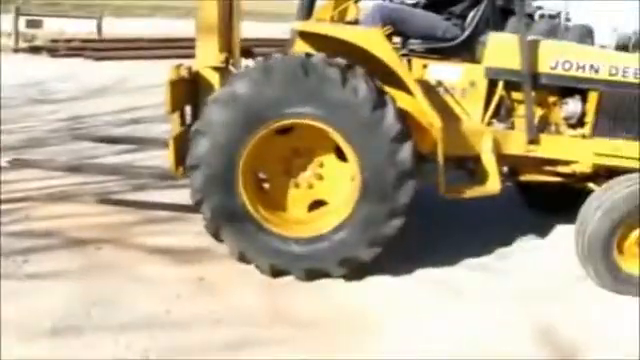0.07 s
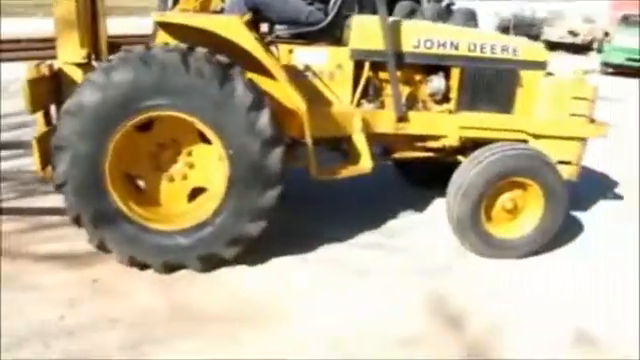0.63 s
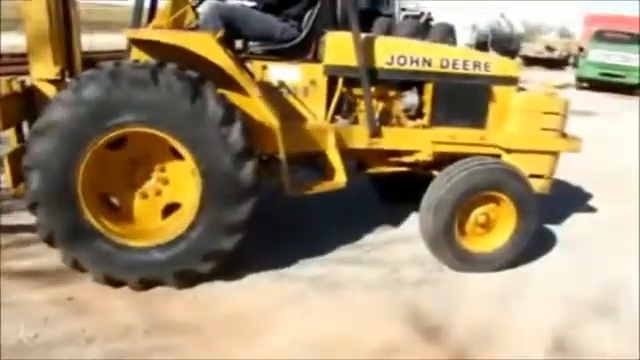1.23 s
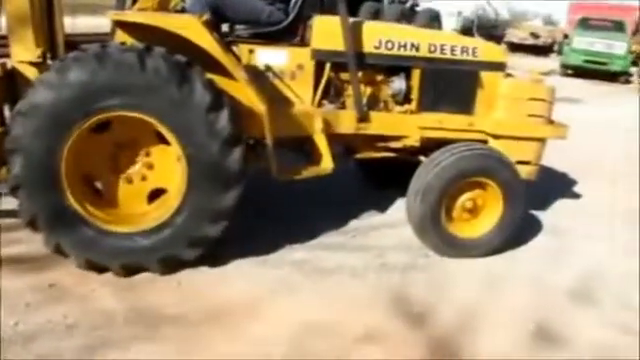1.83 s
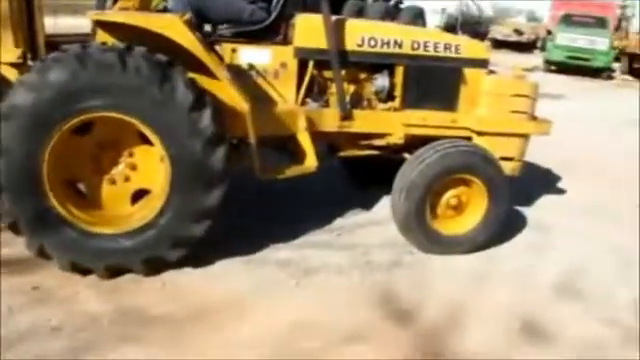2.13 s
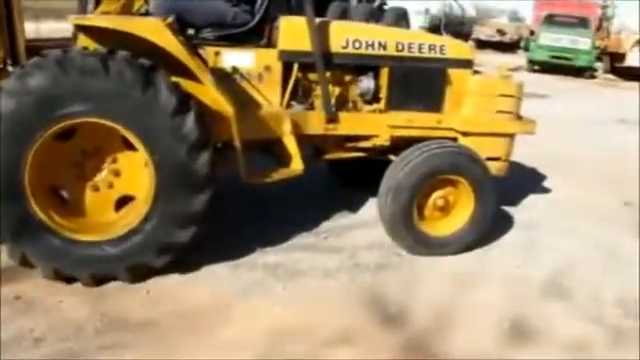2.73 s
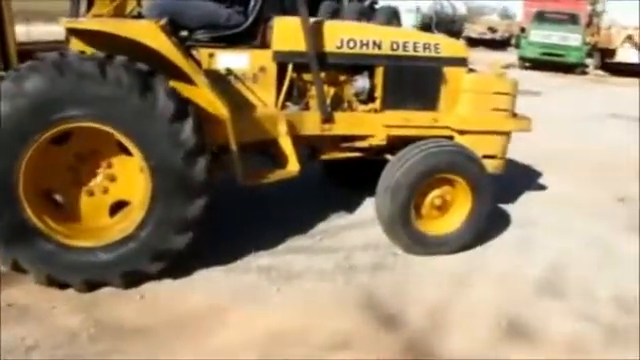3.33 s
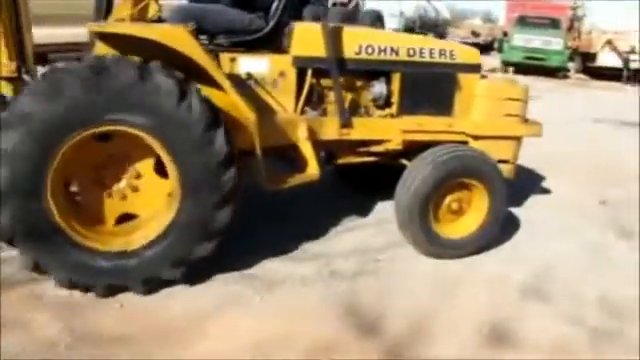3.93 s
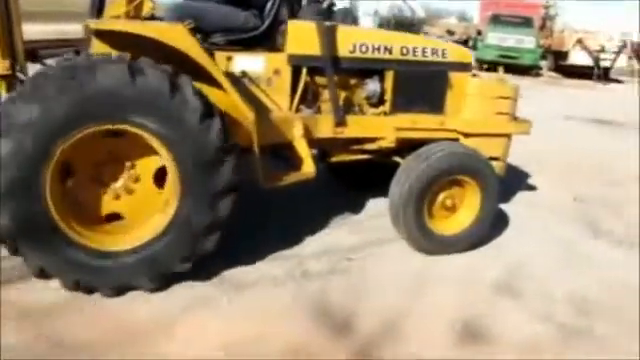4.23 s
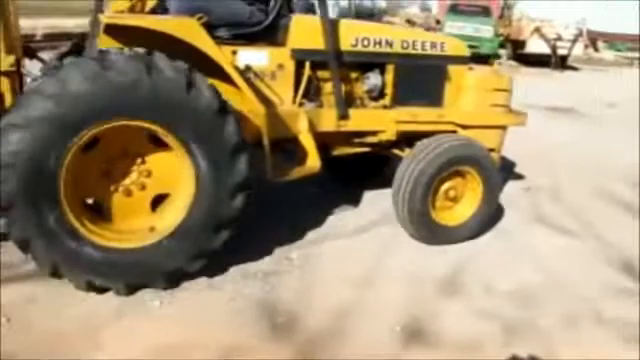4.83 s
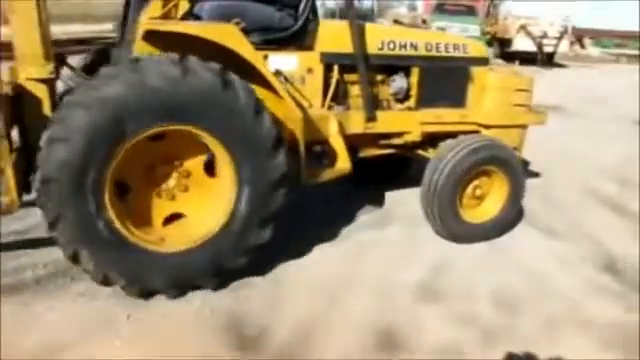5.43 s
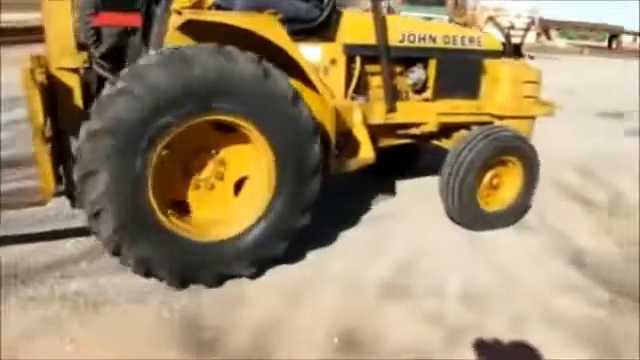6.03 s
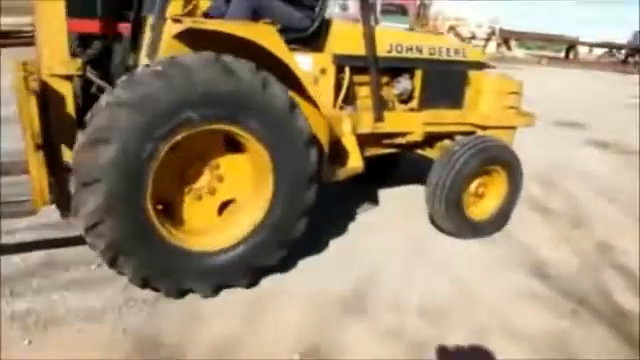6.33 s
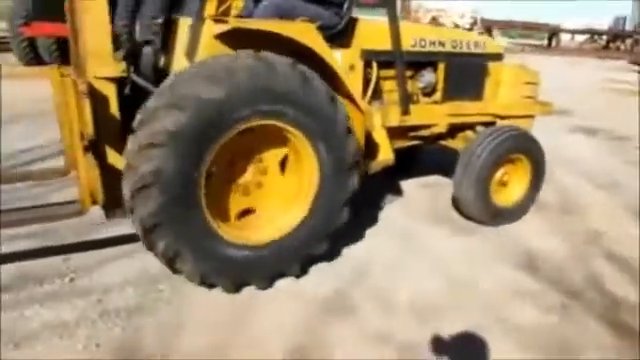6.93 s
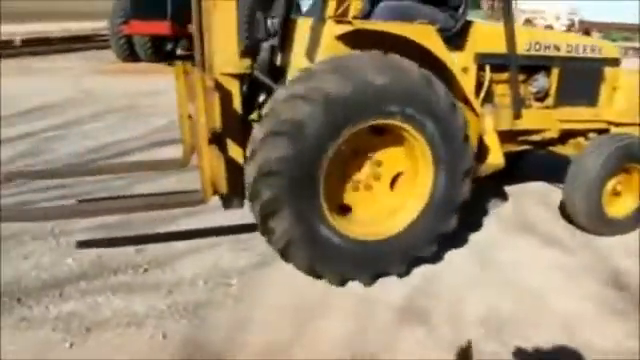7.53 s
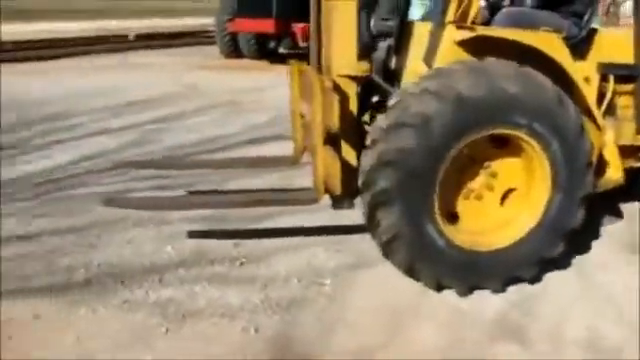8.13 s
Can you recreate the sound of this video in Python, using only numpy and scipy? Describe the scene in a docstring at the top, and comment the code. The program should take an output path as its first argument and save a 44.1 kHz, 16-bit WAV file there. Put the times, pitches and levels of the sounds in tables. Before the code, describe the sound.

A diesel forklift knocks and clatters as it rolls slowly past at close range, with light wind buffeting the microphone.

```python
"""Wind buffets a stereo microphone in a gravel yard; off to the right a three-cylinder diesel forklift knocks.
It rolls slowly past at close range, sagging a little under load as it comes abreast, while the breeze drops.
Every firing knocks the block, rings the panels and thumps the exhaust; injectors and valve gear clatter
between firings and the drive train drones. Tyres crunch faintly on grit, and gusts keep hitting the ports."""
import sys
import numpy as np
from scipy import signal
from scipy.fft import rfft, irfft, next_fast_len
from scipy.io import wavfile
from scipy.ndimage import map_coordinates

SR = 44100
rng = np.random.default_rng(int(sys.argv[2]) if len(sys.argv) > 2 else 0)


def to_wav(s):
    """Save 16-bit WAV."""
    ch = np.atleast_2d(s).T  # columns
    pcm = np.round(np.clip(ch, -1, 1) * 32767)  # PCM
    wavfile.write(sys.argv[1], SR, pcm.astype(np.int16))


N = 360738
TIME = np.arange(N) / SR

# engine speed: t/s, firing rate/Hz
FIRING_RATE = [(0.0, 28.414), (0.9, 28.517), (2.0, 28.319), (3.1, 28.103), (3.5, 26.89), (3.85, 25.395),
               (4.3, 26.159), (4.7, 26.29), (5.05, 27.019), (5.4, 26.75), (5.8, 27.038), (6.5, 27.027),
               (6.95, 27.232), (7.15, 28.122), (7.55, 27.998), (7.8, 28.571), (8.18, 27.489)]
# the three cylinders in firing order: level/dB
CYLINDER_DB = [-.6, 0, .7]
# the forklift's loudness, rising as it nears and ducking briefly after the strongest gusts: t/s, level/dB
FORKLIFT_LEVEL = [(0, -37.5), (1.6, -31.5), (2.6, -31), (3.5, -26), (4.05, -24), (4.9, -24.5), (5.3, -23.5),
                  (5.66, -29), (5.9, -25.5), (6.35, -25), (6.7, -24), (7.0, -26.5), (7.1, -28.5),
                  (8.18, -26.5)]
# its bearing, off to the right at first and last: t/s, lag of the left port/s
LEFT_LAG = [(0, 5e-5), (.8, 1.7e-5), (2, 2e-6), (5, -2e-6), (6, 9e-6), (7, 1e-6), (7.5, 3.5e-5),
            (8.18, 4.7e-5)]
# its colour when far off axis: f/Hz, gain/dB
OFF_AXIS = [(180, 2), (290, -7), (350, -2), (440, 2), (600, 2), (800, 1.5), (2000, -1), (4000, 1),
            (6500, 2.5), (8000, -3.5), (10500, -29)]
# its image at the two microphone ports: f/Hz, likeness/0-1, left minus right/dB
PORT_IMAGE = [(100, 1, -1.5), (600, 0.98, -2), (1100, 0.93, -0.5), (2030, 0.92, -5), (3220, 0.82, -4),
              (5100, 0.73, -0.5), (8600, 1, -0.5)]
# broad spectra of knock, injector tick and drive train: f/Hz, level/dB
KNOCK_SPECTRUM = [(60, -3), (140, 6), (250, -0.5), (400, -1), (680, -6), (900, 1), (1300, -2), (2200, -0.5),
                  (2700, -4), (3500, -6), (5000, -10), (7000, -17.5), (10000, -75)]
TICK_SPECTRUM = [(1500, -19), (3500, 1), (5000, 1.5), (6500, -2), (9000, -2.5), (10500, -37), (12000, -56)]
DRONE_SPECTRUM = [(60, -16), (130, -14), (250, -0.5), (340, -3.5), (520, -1.5), (700, -2.5), (1100, -1.5),
                  (2000, -1.5), (4000, -3.5), (9000, -41)]
# resonances of block and covers, then of gear housing and hood: f/Hz, width/Hz, boost/dB
BLOCK_MODES = [(1025, 69, 4.5), (1361, 36, 9.5), (1514, 57, 6.5), (1917, 42, 7.5), (2023, 37, 8),
               (3320, 50, 4.5)]
HOUSING_MODES = [(224, 28, 5), (253, 16, 9.5), (424, 17, 11), (492, 26, 8.5), (567.5, 17, 8)]
# panels and guards that beam their ring past the microphone in turn:
# f/Hz, width/Hz, level against the knock/dB, facing at t/s, spread/s, buzz between firings/dB
PANEL_MODES = [(426, 18, -10.5, 3.15, .45, 6), (455, 90, -3.5, 6.76, .22, 6), (560, 8, -14, 5.4, .4, 6),
               (827, 24, -8.5, 6.55, .7, 6), (840, 50, -12, 3.4, .4, 3), (1704, 20, -12, 4.9, .7, 0),
               (2835, 80, -13.5, 2, 1.2, -6), (3175, 60, -14, 2.4, 1.4, -6), (3490, 130, -8.5, .5, .4, -12),
               (3620, 50, -15, 7.2, .5, -3), (3840, 110, -11.5, 7.9, 1.0, -14)]
# thin steel ringing on the engine: t/s, f/Hz, level against the knock/dB
STEEL_RING = [(1, 3470, -17), (3.5, 3420, -18), (4.3, 3430, -14), (5.2, 3440, -12), (5.6, 3380, -16),
              (5.95, 3385, -11.5), (6.25, 3440, -17), (6.55, 3470, -11.5), (7, 3450, -18),
              (8.18, 3440, -14)]
# exhaust note: multiple of the firing rate, level side on/dB, level mast on/dB
EXHAUST_HARMONICS = [(1, -3.5, 0.5), (2, -2.5, -1), (3, -10, -8.5), (4, -9.5, -9.5), (5, -6.5, -14),
                     (6, -13.5, -15), (7, -8, -5.5), (8, -9.5, -10), (10, -13, -20), (12, -16, -23)]
# single firings that knock harder, and an occasional clank or thump: t/s, relative level/dB, f/Hz, t60/s
HARD_KNOCKS = [(0.693, 5, 780, 0.027), (.822, -3, 2700, 0.038), (2.442, 0, 2010, .04),
               (3.429, 2, 1100, 0.057), (3.555, -3, 2980, 0.045), (4.442, -1, 1700, .04),
               (4.63, 6.5, 2550, 0.031), (5.081, -0.5, 2000, .04), (5.118, -0.5, 1510, 0.064),
               (5.266, 2.5, 1700, 0.068), (6.271, 2, 1300, 0.038), (6.419, 2, 1500, .04),
               (6.716, 1.5, 1900, .05), (6.968, -5, 4200, 0.18), (6.973, -0.5, 940, .14),
               (6.985, -3, 173, .16)]
# stones squeezed under a tyre: t/s, level/dB
STONE_CRUNCHES = [(6.827, -30), (6.971, -28)]
# crackle of grit: f/Hz, level/dB
GRIT_SPECTRUM = [(400, -32), (1500, -9.5), (4000, 0.5), (7000, -3.5), (9500, -7.5), (12000, -26.5)]
# the breeze, fresh at first, then light air: t/s, relative level/dB
BREEZE_LEVEL = [(0, -25), (.48, -20.5), (.72, -31), (1.15, -28.5), (1.34, -24.5), (2.15, -23.5),
                (2.4, -31.5), (2.8, -42), (4.3, -40.5), (5.15, -46), (6.0, -38), (7.3, -47), (8.18, -45)]
# gusts on the ports: t/s, length/s, relative flutter/dB, relative low push/dB, left minus right/dB
GUST_EVENTS = [(0.027, 0.054, -22.5, -35, 12), (0.935, 0.081, -22, -28, 18), (1.328, 0.055, -22.5, -33, 9),
               (1.531, 0.11, -23.5, -28, 5), (1.944, 0.3, -26, -26.5, 12), (2.467, 0.11, -23.5, -30, 6),
               (3.005, 0.13, -31, -35, 7), (4.24, 0.19, -29, -27.5, 8), (4.493, 0.044, -21, -22.5, 19),
               (4.713, 0.12, -30, -31.5, 16), (5.304, 0.036, -18.5, -18, 7), (5.504, 0.1, -19.5, -31, 14),
               (5.769, 0.08, -25, -22.5, 4), (5.86, .27, -33.5, -25, -8), (6.29, 0.17, -42, -29.5, 15),
               (6.757, 0.04, -20.5, -24, -15), (6.898, 0.19, -29.5, -22.5, -23), (7.36, 0.049, -32, -22, 7),
               (7.434, 0.13, -27, -22.5, 17), (7.793, 0.054, -24, -21.5, 13), (7.916, 0.28, -45, -27, 3),
               (8.106, 0.063, -20, -20, 15)]
# wind noise of breeze, gusts and slow eddies: f/Hz, level/dB
BREEZE_SPECTRUM = [(30, -24), (90, 1.5), (160, 0.5), (240, -2.5), (350, -8), (500, -15), (800, -33),
                   (2000, -33), (6000, -93)]
GUST_SPECTRUM = [(30, -17), (90, -1), (150, -1), (240, -2.5), (350, -10.5), (500, -15.5), (800, -28),
                 (2000, -29), (6000, -95)]
EDDY_SPECTRUM = [(8, 4.5), (25, -4), (60, 5.5), (100, 2), (160, -9), (300, -34), (1000, -99)]

# balance of each part with the forklift at USUAL_DB: side on/dB, mast on/dB, dB per dB of forklift level
KNOCK_MIX, TICK_MIX = (1.32, 0.37, 1), (-11.5, -13, 1)
DRIVE_MIX, EXHAUST_MIX = (-7.5, -3.5, 0.79), (-.3, -1.7, 0.92)
USUAL_DB = -24
TURN_MIDDLE_S, TURN_S = 5.72, 2.7
CRACK_DB, SLAP_DB, TAP_DB = -4.7, -13.5, -9  # against the body of the knock
FREE_RATE_HZ, HARDEN_DB_PER_HZ = 28.5, .4  # the crack hardens as load drags the engine down
PANEL_WAVER, PANEL_AWAY_DB = .004, -15
EDDY_DB, EDDY_SWING_DB, BREEZE_SWING_DB = -32.5, 3.5, 2
GEAR_ORDER = 21  # whine cycles per firing
TOP_HZ = 11600


def diesel_knock(cycle, level_db):
    """Each firing cracks and rings the block and its panels; piston slap and a valve tap follow."""
    crack = blows(cycle, place=.07, rise=.0005, t60=.04, scatter_db=1.5, jitter=.0004)
    knock = blows(cycle, place=.01, rise=.0035, t60=.125, scatter_db=.7, jitter=.0005)
    slap = blows(cycle, place=.4, rise=.0005, t60=.04, scatter_db=2, jitter=.002)
    tap = blows(cycle, place=.76, rise=.001, t60=.11, scatter_db=1.2, jitter=.003)
    crack_db = CRACK_DB + HARDEN_DB_PER_HZ * (FREE_RATE_HZ - curves(FIRING_RATE)[0])
    power = knock + amp(crack_db) ** 2 * crack + amp(SLAP_DB) ** 2 * slap + amp(TAP_DB) ** 2 * tap
    grain = amp(1.2 * wobble(700))  # each knock is a spray of small metal contacts
    force = np.sqrt(power) * grain * port_noise()
    block = body(force, KNOCK_SPECTRUM, BLOCK_MODES)
    return amp(level_db) * (block + panels(crack) + thin_ring(crack))


def panels(crack):
    """Each panel rings at every crack, buzzes in between, and stands out while it faces the microphone."""
    out = np.zeros((2, N))
    hiss = port_noise()
    waver = 1 + PANEL_WAVER * wobble(5)
    for hz, width_hz, db, facing_s, spread_s, buzz_db in PANEL_MODES:
        shake = np.sqrt(crack + amp(buzz_db) ** 2) * hiss
        facing = np.exp(-((TIME - facing_s) / spread_s) ** 2)
        out += amp(db) * np.maximum(facing, amp(PANEL_AWAY_DB)) * resonance(shake, hz * waver, width_hz)
    return out


def thin_ring(crack):
    """Thin steel rings on from one firing to the next, drifting in pitch."""
    hz, db = curves(STEEL_RING)
    return amp(db) * resonance(np.sqrt(crack + 2) * port_noise(), hz, width_hz=70)


def exhaust(cycle, level_db):
    """The muffler passes only the low multiples of the firing rate, each slightly unsteady."""
    note = np.zeros(N)
    for multiple, side_db, mast_db in EXHAUST_HARMONICS:
        gain = amp(turning(side_db, mast_db) + 3.5 * wobble(11))
        phase = 2 * np.pi * multiple * cycle + rng.uniform(0, 2 * np.pi)
        note += gain * np.sin(phase + .5 * wobble(11))
    return amp(level_db - 1.5) * unit(note)


def drive_train(cycle, level_db, size=600):
    """Cams and gears push the housing alike every three firings; the fan rushes and one gear whines."""
    teeth = irfft(np.exp(2j * np.pi * rng.random(size // 2 + 1)))
    position = (cycle + .006 * wobble(8)) * size / 3
    force = unit(map_coordinates(teeth, [position], mode="grid-wrap"))
    fan = port_noise()
    push = fan + amp(-3 + 1.5 * wobble(4)) * force
    whine_db = level_db + turning(-18, -9.5) + 3 * wobble(9)
    whine = amp(whine_db) * np.sin(2 * np.pi * cycle * GEAR_ORDER + 1.2 * wobble(22))
    return amp(level_db + 4.5) * body(push, DRONE_SPECTRUM, HOUSING_MODES) + whine


def injectors(cycle, level_db):
    """Pump and nozzles tick brightly just ahead of each knock, over a light hiss."""
    ticks = blows(cycle, place=-.005, rise=.0014, t60=.058, scatter_db=1.4, jitter=.0005)
    force = np.sqrt(ticks + amp(-13)) * amp(0.52 * wobble(900)) * port_noise()
    return amp(level_db - 3) * body(force, TICK_SPECTRUM)


def hard_knocks(level_db):
    """Single firings knock harder, with an occasional clank or thump; each rings round its own pitch."""
    out = np.zeros((2, N))
    hiss = port_noise()
    for s, db, hz, t60 in HARD_KNOCKS:
        span = slice(int(s * SR), int(s * SR) + SR // 8)
        band = signal.butter(2, [hz / 1.3, hz * 1.3], "band", fs=SR, output="sos")
        ring = unit(signal.sosfilt(band, hiss[:, span])) + 0.12 * unit(hiss[:, span])
        out[:, span] += amp(db + 10.5) * ring * strike(TIME[span] - s, rise=0.0017, t60=t60)
    return amp(level_db) * filtered(out, lambda f: 1 / (1 + (f / 6000) ** 4))


def tyres(level_db):
    """Grit crackles under the lugs; two stones crunch louder."""
    crunch = sum(amp(db) * strike(TIME - s, rise=0.0018, t60=0.12) for s, db in STONE_CRUNCHES)
    grit = body(amp(0.99 * wobble(1200)) * port_noise(), GRIT_SPECTRUM)
    rolling = amp(level_db - 18.5 + 2.95 * wobble(12))
    return grit * (crunch + rolling)


def wind():
    """Turbulence right on the ports: a breeze from the left, slow eddies, and gusts that rise and fall."""
    breeze_db = curves(BREEZE_LEVEL)[0] + BREEZE_SWING_DB * wobble(12)
    breeze = leaning(lean_db=9.5) * amp(breeze_db) * turbulence(BREEZE_SPECTRUM)
    flutter_power = np.zeros((2, N))
    push_power = (leaning(lean_db=2) * amp(EDDY_DB + EDDY_SWING_DB * wobble(7.4))) ** 2
    rise_s, fall_s = 0.012, 0.054
    for s, length, flutter_db, push_db, lean_db in GUST_EVENTS:
        envelope = np.clip(np.minimum((TIME - s) / rise_s, .5 + (s + length - TIME) / fall_s), 0, 1)
        power = (leaning(lean_db) * envelope) ** 2
        flutter_power += amp(flutter_db) ** 2 * power
        push_power += amp(push_db) ** 2 * power
    flutter = np.sqrt(flutter_power) * turbulence(GUST_SPECTRUM)
    push = np.sqrt(push_power) * turbulence(EDDY_SPECTRUM)
    return amp(3.5) * (breeze + flutter) + amp(3) * push


def turbulence(spectrum):
    """Fairly even buffeting of rms 1, unrelated at the two ports."""
    return unit(np.tanh(body(rng.standard_normal((2, N)), spectrum) / 2))


def leaning(lean_db):
    """Gains of the two ports, mean power 1, for wind from one side."""
    return unit(amp(np.array([[lean_db], [-lean_db]]) / 2))


def placed(machine):
    """From off to the right the sound reaches the left port later and changes colour."""
    lag, = curves(LEFT_LAG)
    aside = np.clip(lag / lag.max(), 0, 1)
    coloured = filtered(machine, lambda f: amp(along(OFF_AXIS, f)))
    left, right = (1 - aside) * machine + aside * coloured
    return np.array([map_coordinates(left, [(TIME - lag) * SR], mode="nearest"), right])


def part_level(mix):
    """Level in dB of one part, following the forklift's loudness and its turn."""
    side_db, mast_db, growth = mix
    forklift_db, = curves(FORKLIFT_LEVEL)
    return USUAL_DB + growth * (forklift_db - USUAL_DB) + turning(side_db, mast_db)


def turning(side_db, mast_db):
    """A level in dB that shifts as the mast end comes round to the microphone."""
    return side_db + (mast_db - side_db) * np.clip(.5 + (TIME - TURN_MIDDLE_S) / TURN_S, 0, 1)


def port_noise():
    """White noise from the forklift, nearly alike at the two ports."""
    image = np.array(PORT_IMAGE)
    angle = lambda f: np.arccos(np.clip(along(image[:, :2], f), 0, 1)) / 2
    spread = lambda f: np.array([np.cos(angle(f)), np.sin(angle(f))])
    balance = lambda f: amp(np.outer([1, -1], along(image[:, ::2], f)) / 2)
    mid, side = filtered(rng.standard_normal((2, N)), spread)
    return filtered(np.array([mid + side, mid - side]), balance)


def blows(cycle, place, rise, t60, scatter_db, jitter):
    """Power envelope, mean 1, of one blow at a place in every firing cycle; rise, t60, jitter in s."""
    firings = np.arange(np.ceil(cycle[-1]))
    timing, force = rng.standard_normal((len(firings), 2)).T
    onset_s = np.interp(firings + place, cycle, TIME, right=TIME[-1] + 1) + jitter * timing
    onsets = np.maximum((onset_s * SR).astype(int), 0)
    strength = amp(np.resize(CYLINDER_DB, len(firings)) + scatter_db * force)
    impulses = np.bincount(onsets, strength ** 2, N)[:N]
    power = np.abs(signal.fftconvolve(impulses, strike(TIME[:SR // 5], rise, t60) ** 2)[:N])
    return power / power.mean()


def strike(t, rise, t60):
    """Envelope of one blow at time t after contact."""
    t = np.maximum(t, 0)
    return (1 - np.exp(-t / rise)) * amp(-60 * t / t60)


def body(x, spectrum, modes=()):
    """x through a broad spectrum with ringing resonances on top, at rms 1."""
    def ring(f):
        return 1 + sum((amp(db) - 1) * 1j * f * width / (hz * hz - f * f + 1j * f * width)
                       for hz, width, db in modes)
    return unit(filtered(x, lambda f: amp(along(spectrum, f)) * ring(f)))


def resonance(x, hz, width_hz):
    """x through one resonance whose pitch moves, at rms 1."""
    carrier = np.exp(2j * np.pi * np.cumsum(hz) / SR)
    lowpass = signal.butter(2, width_hz / 2, fs=SR, output="sos")
    return unit((signal.sosfilt(lowpass, x * carrier.conj()) * carrier).real)


def filtered(x, response):
    """x through a frequency response."""
    size = next_fast_len(N + SR // 4)
    return irfft(rfft(x, size) * response(np.fft.rfftfreq(size, 1 / SR)), size)[..., :N]


def wobble(rate):
    """A smooth random curve, rate knots a second."""
    return map_coordinates(rng.standard_normal(int(N * rate / SR) + 4), [TIME * rate])


def curves(rows):
    """One value per sample for each column after the time."""
    s, *columns = np.transpose(rows)
    return [np.interp(TIME, s, column) for column in columns]


def along(points, hz):
    """(f/Hz, value) points read at hz on a log axis."""
    f, values = np.transpose(points)
    return np.interp(np.log(hz + 1), np.log(f + 1), values)


def amp(db):
    return 10 ** (np.asarray(db) / 20)


def unit(x):
    return x / np.sqrt(np.mean(x ** 2) + 1e-20)


def scene():
    """The forklift crosses the yard in front of the microphone, with wind on the ports."""
    cycle = np.cumsum(curves(FIRING_RATE)[0]) / SR - .27  # running count of firings
    knock_db = part_level(KNOCK_MIX)
    machine = diesel_knock(cycle, knock_db) + injectors(cycle, part_level(TICK_MIX))
    machine += drive_train(cycle, part_level(DRIVE_MIX)) + exhaust(cycle, part_level(EXHAUST_MIX))
    machine += hard_knocks(knock_db) + tyres(knock_db)
    return placed(machine) + wind()


def record(dry):
    """The camera's microphone channels cut off steeply above TOP_HZ."""
    return filtered(dry, lambda f: 1 / np.sqrt(1 + (f / TOP_HZ) ** 80))


dry = scene()
out = record(dry)
to_wav(out)
```